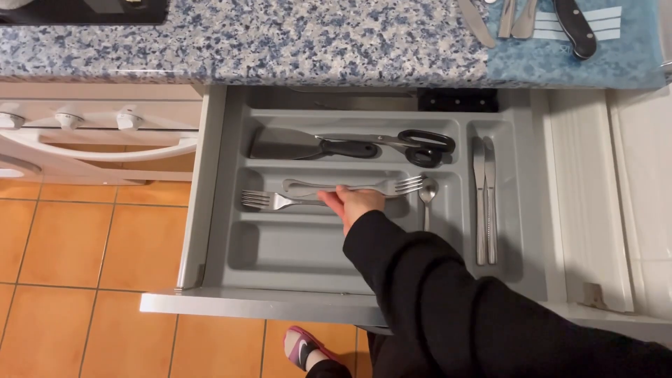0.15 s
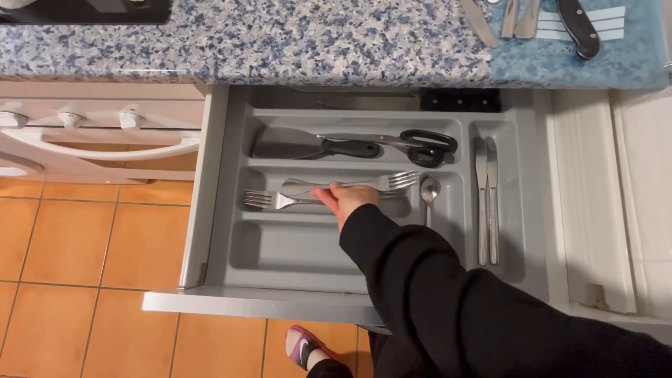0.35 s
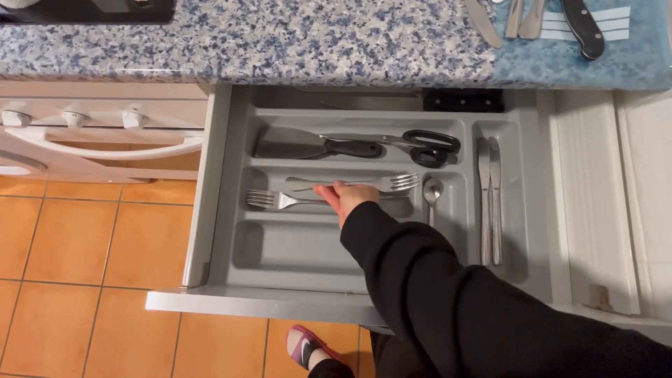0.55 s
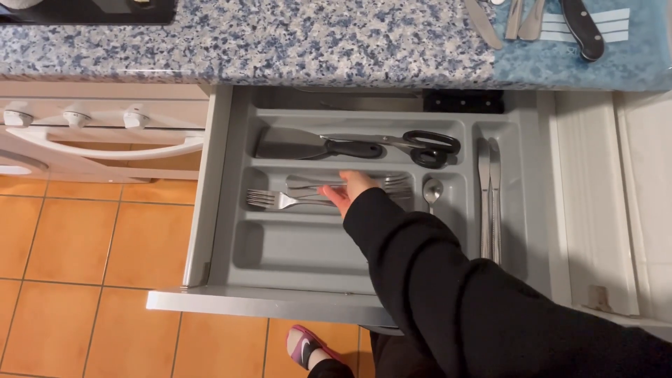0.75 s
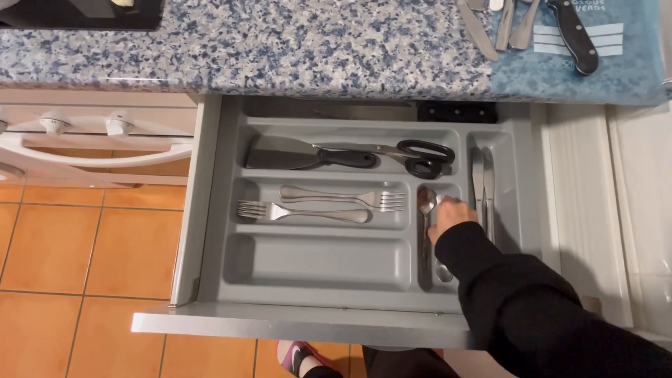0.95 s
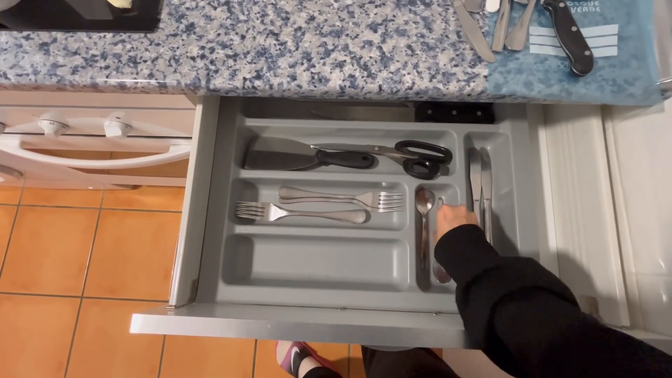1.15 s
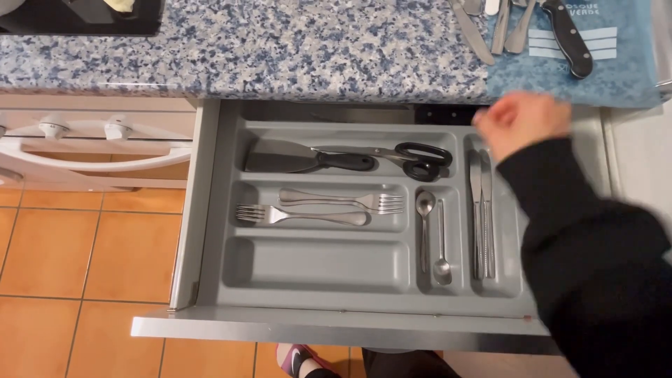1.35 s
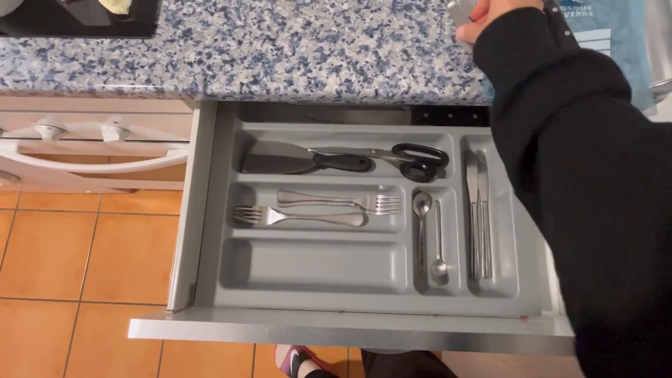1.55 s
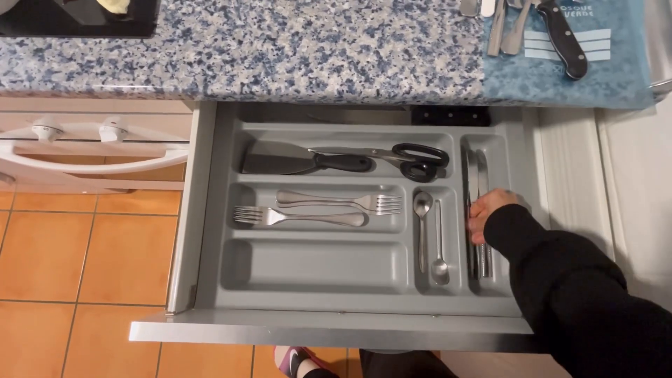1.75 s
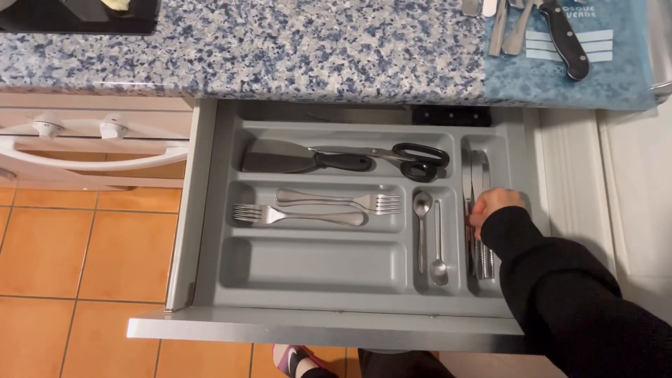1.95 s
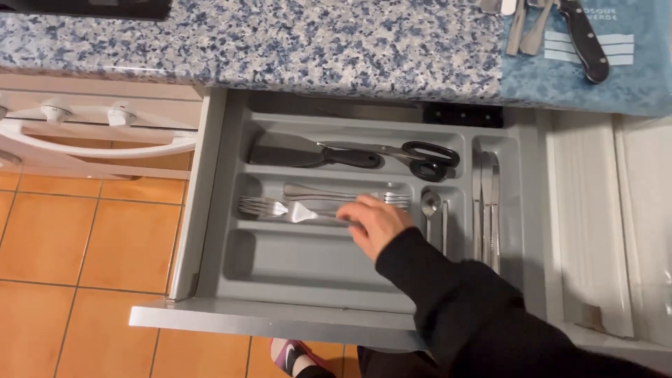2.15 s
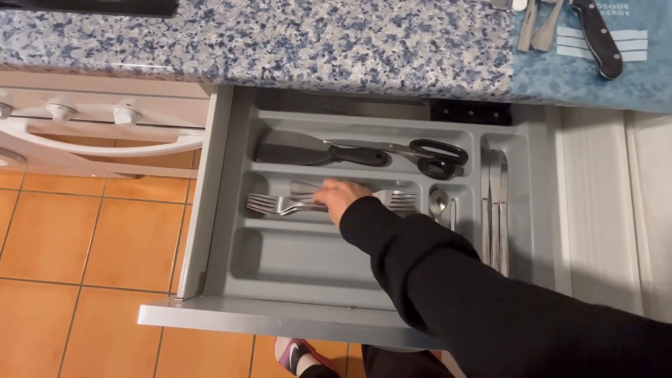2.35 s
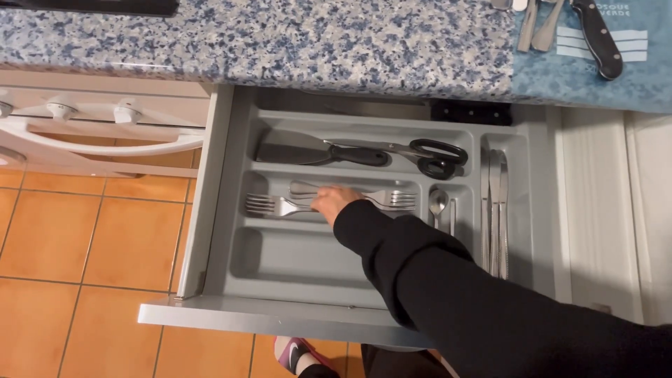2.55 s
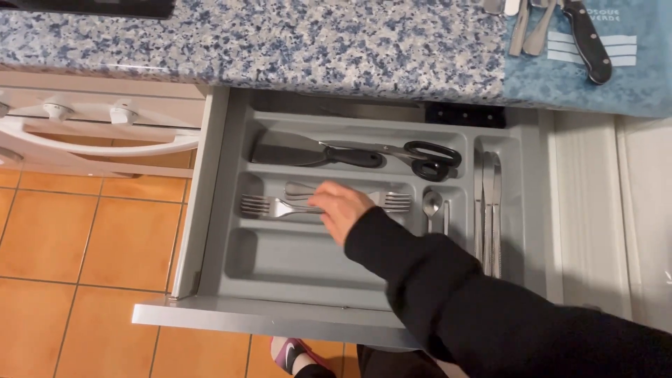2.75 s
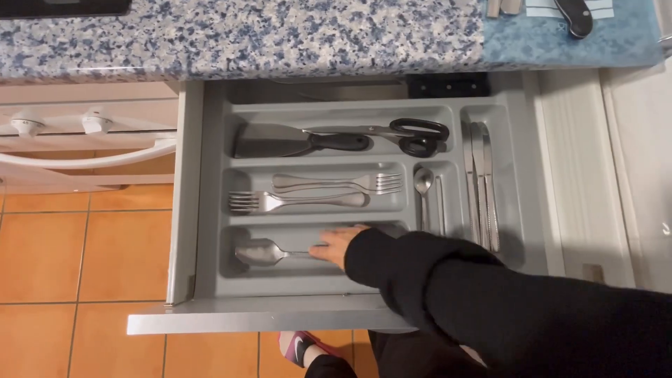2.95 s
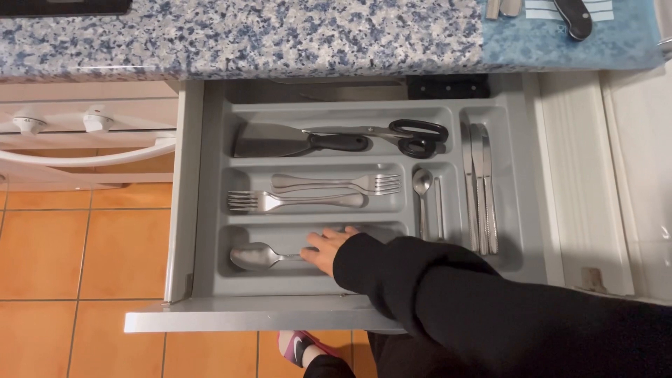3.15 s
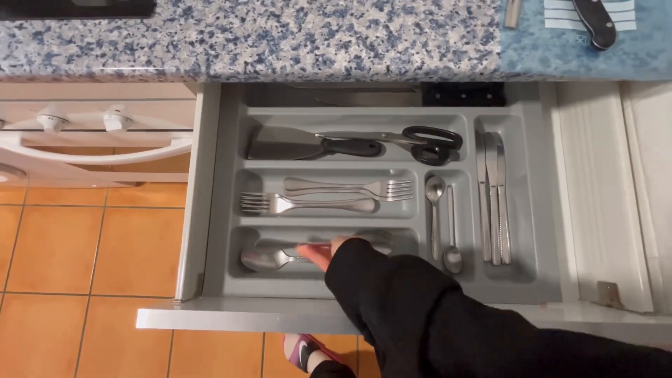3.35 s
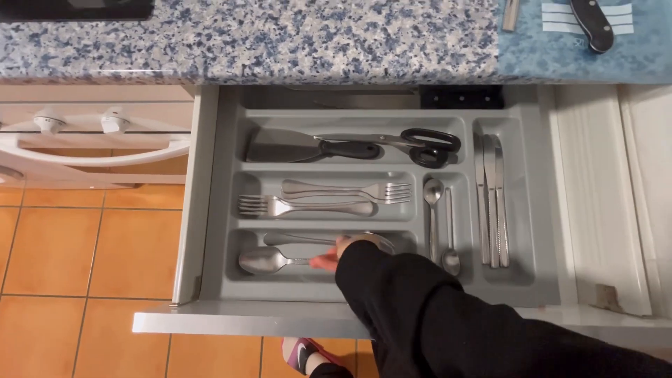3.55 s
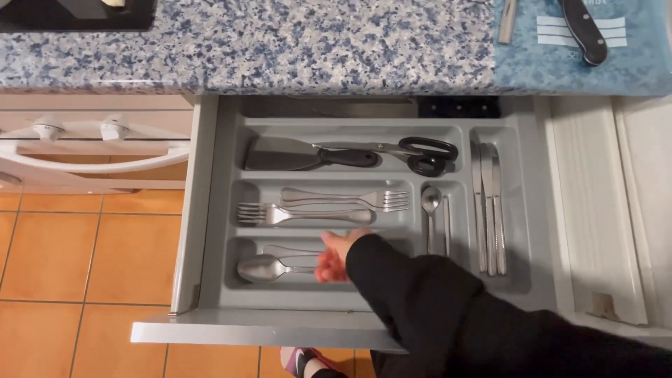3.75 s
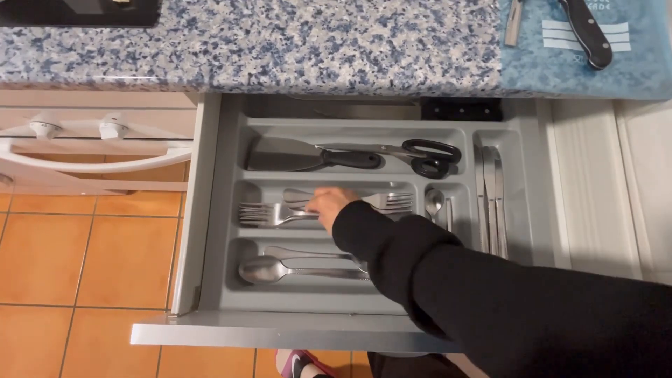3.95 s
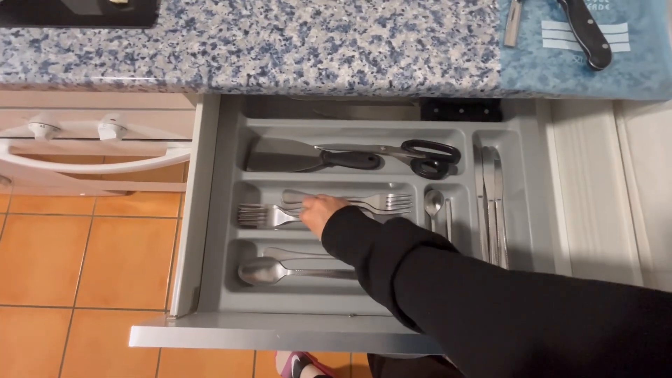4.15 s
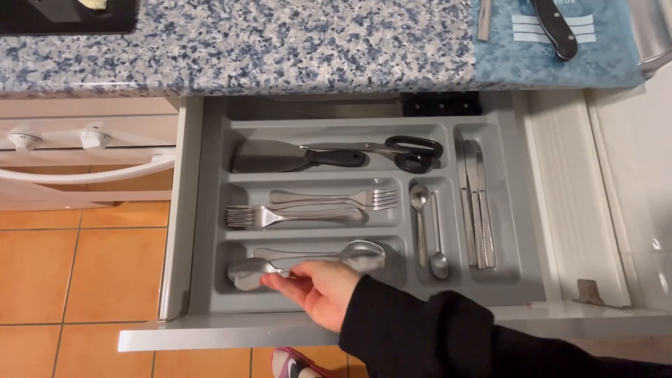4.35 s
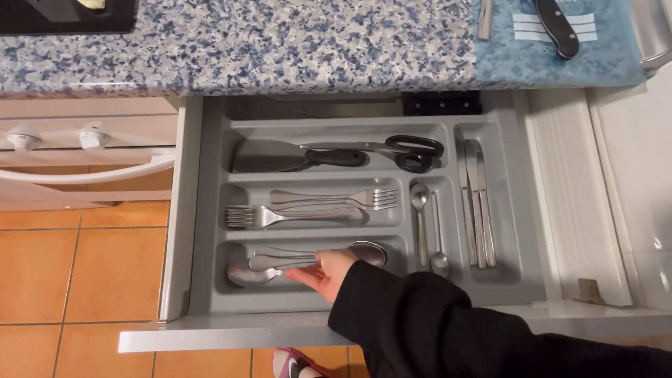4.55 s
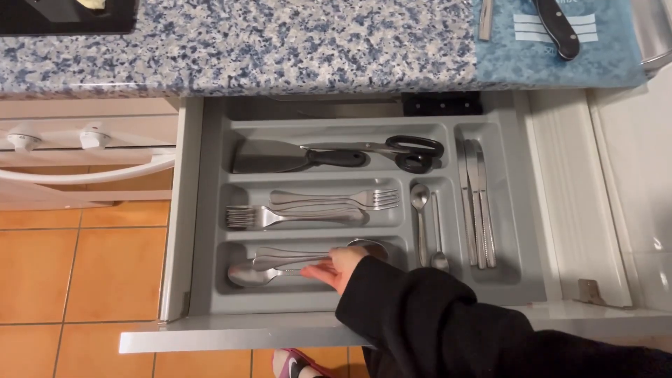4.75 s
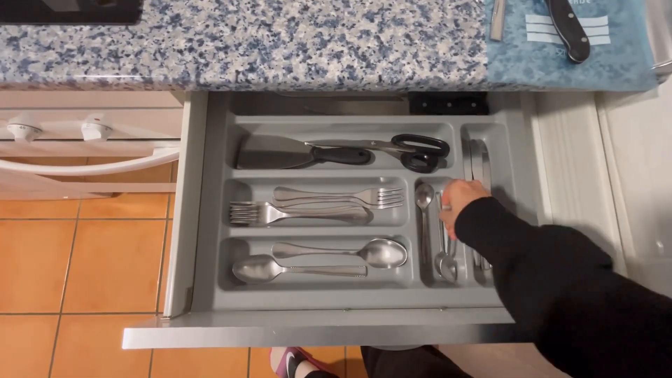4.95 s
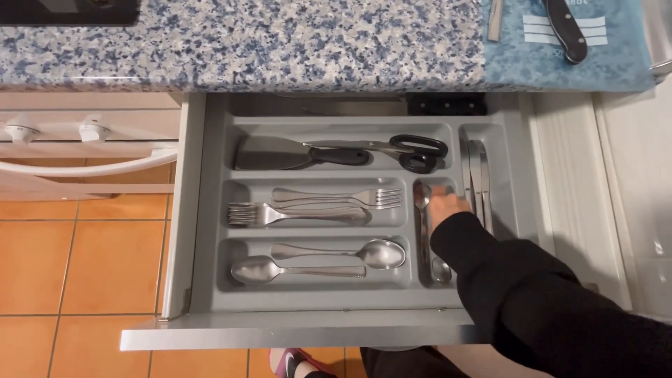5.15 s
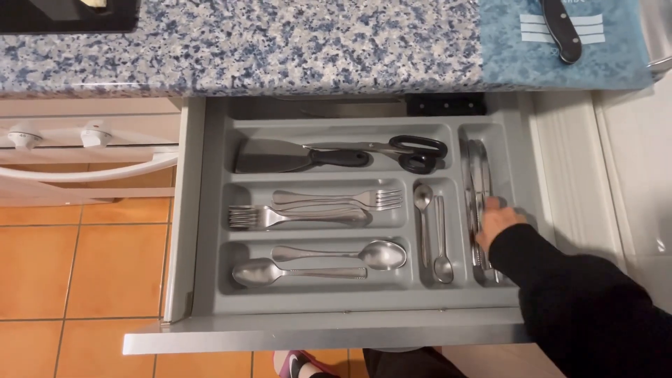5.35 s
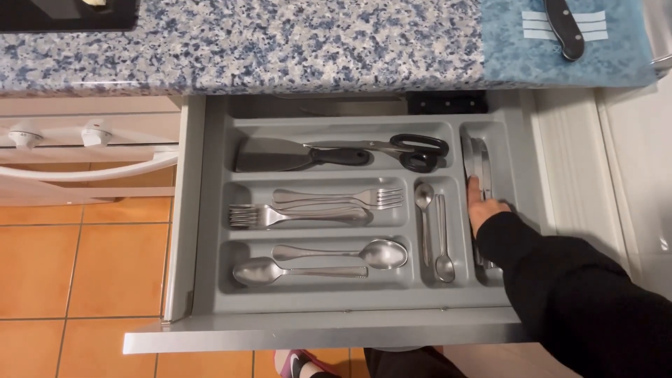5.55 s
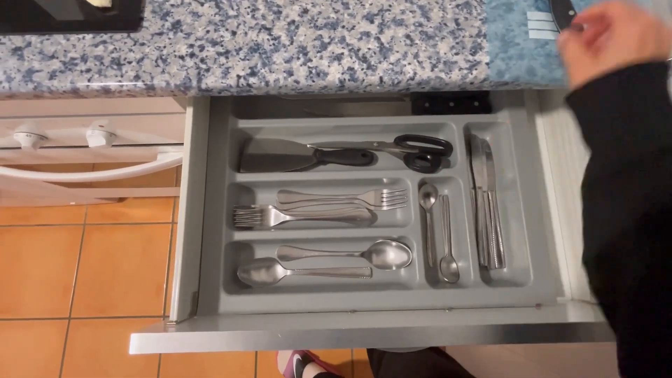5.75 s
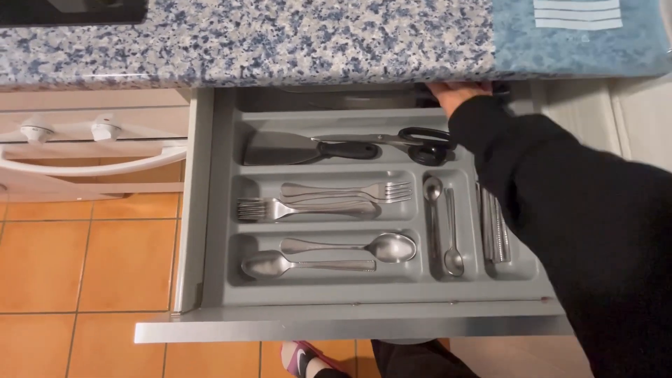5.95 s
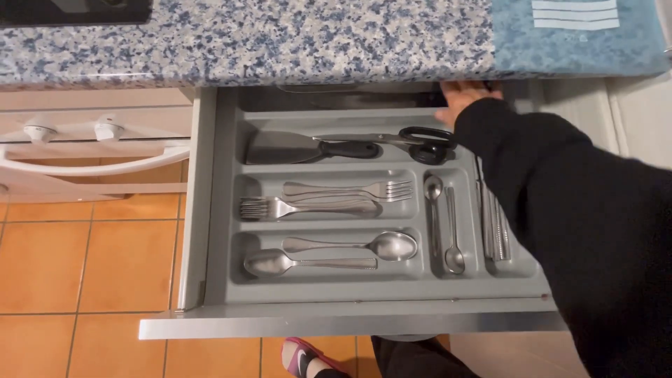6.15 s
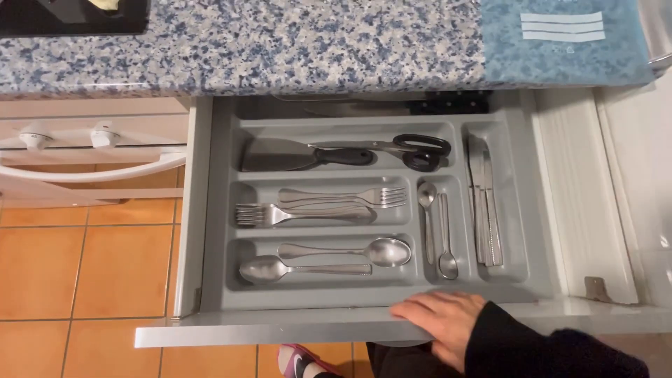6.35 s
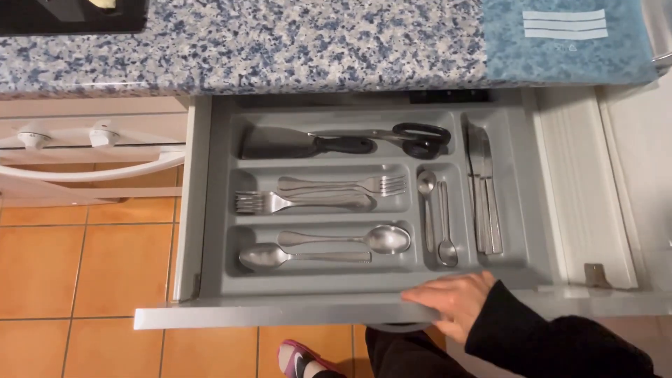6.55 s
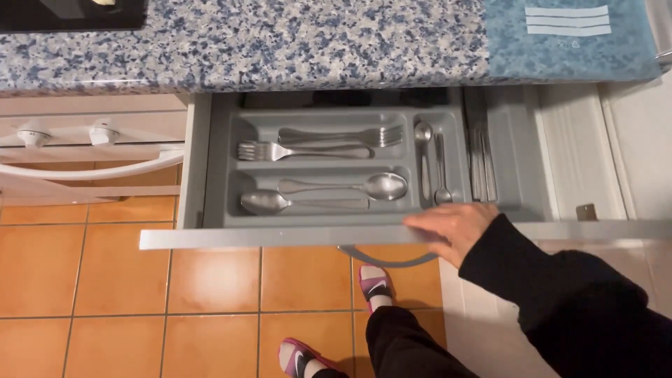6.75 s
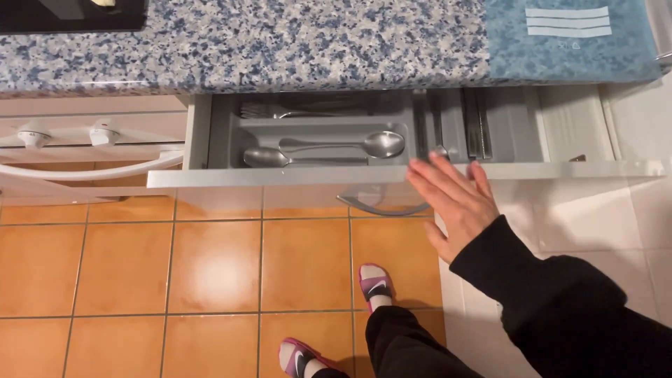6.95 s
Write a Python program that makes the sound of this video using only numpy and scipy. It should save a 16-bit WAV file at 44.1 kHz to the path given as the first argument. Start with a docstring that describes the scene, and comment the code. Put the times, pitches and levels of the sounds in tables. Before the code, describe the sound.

In a small kitchen, steel cutlery is put piece by piece into a plastic drawer tray. Each landing is a hard hollow knock with rapid rattling and short bright jingling. One handful knocks on the counter, faint metallic squeaks come later, and a knife lands behind the tray with a clearer ring. Finally the drawer rolls on rumbling runners. Close stereo microphone, loud blows slightly overloaded, abrupt cuts.

```python
"""Open kitchen drawer: steel forks, spoons and knives are dropped one by one into a plastic tray.
Each blow is a train of contacts: they ring tray and steel modes, clatter, and jangle the neighbours.
One handful knocks on the counter; one knife lands behind the tray and rings free.
Pieces squeak by stick-slip, shown as wavering harmonics; at the end the drawer rolls shut on rumbling noise.
The room answers; at each break all tails stop and the room tone fades back in."""
import sys
import numpy as np
from scipy import signal
from scipy.fft import rfft, irfft
from scipy.io import wavfile
from scipy.ndimage import uniform_filter1d

SR = 44100
rng = np.random.default_rng(int(sys.argv[2]) if len(sys.argv) > 2 else 0)


def master_out(mix):
    """Clip the mix to full scale and print it as 16-bit PCM to the path in sys.argv[1]."""
    frames = np.transpose(np.atleast_2d(mix))
    ceiling = np.clip(frames, -1, 1)
    pcm = np.round(ceiling * 32767).astype(np.int16)
    wavfile.write(sys.argv[1], SR, pcm)


N = 308700

# Strikes, each with its rattle: start_s, peak_db, steel_ring_db (re peak), rattle_t60_s (floored at 0.03)
STRIKES = [(0.0044, -30, -30, 0.37), (0.1621, -16, -19.5, 0.14), (0.269, -34.5, -17, 0.13),
           (0.31, -29, -67, 0.19), (0.5603, -25, -10, 0.09), (0.616, -20, -2.5, 0.22),
           (0.654, -3.5, -30, 0.076), (0.6835, -14.5, -41, 0.43), (0.781, -19, 4.5, 0.29),
           (0.8, -3.5, -10.5, 0.097), (0.862, -22, -26, 1), (0.974, -30, -52, 0.47),
           (1.051, 2.5, -33, 0.031), (1.0897, -4, -30, 0.046), (1.1125, -12, -37, 0.17),
           (1.14, -16, -36, 0.083), (1.5317, -16.5, 5.5, 0.76), (1.5595, -9.5, -8, 0.032),
           (1.576, -30, -21, 0.1), (1.7516, -10, -33, 0.065), (1.778, 4, -33.5, 0.047),
           (1.8096, -21, 0.5, 0.25), (1.876, 6, -6, 0.053), (2.3542, 3, -14.5, 0.038),
           (2.4044, -6.5, -9.5, 0.067), (2.419, -3.5, -5, 0.17), (2.8047, -13.5, -24.5, 0.61),
           (2.863, -12.5, -77, 0.14), (2.9548, 7.5, -39.5, 0.072), (3.33, -26.5, -34, 0.8),
           (3.4074, -10.5, -10.5, 0.053), (3.4377, 2, -31, 0.1), (3.458, -1, -6.5, 0.037),
           (3.603, -15, -44, 0.12), (3.628, -17, 4, 0.02), (3.7524, -34, -33, 0.046),
           (3.941, -11.5, -14.5, 0.39), (3.964, -16.5, -8, 0.1), (3.9898, 1, -14, 0.077),
           (4.046, -21, -1, 0.06), (4.1987, -28, -6.5, 0.041), (4.431, -15.5, 5.5, 0.47),
           (4.507, -11, 9.5, 0.12), (4.546, -5.5, 3.5, 0.16), (4.907, -8, -31, 0.052),
           (4.9902, -8, -13, 0.17), (5.061, -12.5, -6, 0.21), (5.1036, -4.5, 2.5, 0.083),
           (5.1389, -12.5, 12, 0.044), (5.2518, -20, -30, 0.036), (5.4171, -12, 2, 0.33),
           (5.466, -3.5, -1, 0.087), (5.6164, -25, -14, 0.45), (5.657, -33.5, 7.5, 0.12),
           (5.7355, -26, 6, 0.11), (5.798, -28.5, -14, 0.082), (6.0117, 2, -33, 0.15),
           (6.0863, -12.5, -14.5, 0.16), (6.1668, -13.5, -58, 0.097), (6.2746, -28.5, -57, 0.16),
           (6.3648, -29.5, -42, 0.068), (6.763, -27, -4, 0.039)]
# Tray and drawer modes: mode_hz, level_db
TRAY = [(107.7, -46), (193.8, -44.5), (263.8, -46.5), (382.2, -51), (506.0, -19), (624.5, -23.5),
        (769.8, -51), (840, -48.5), (931.3, -33.5), (1114, -33), (2040, -28.5)]
# Counter top modes: mode_hz, level_db
COUNTER = [(345, -23.5), (540, -26), (2435, -44), (2710, -16.5), (3970, -24), (4215, -20)]
# Modes of the space behind the tray: mode_hz, level_db
DRAWER_BACK = [(107, -43), (527, -32.5), (625, -28.5), (750, -28.5), (1016, -32), (1944, -38.5)]
# Steel modes of a paring knife: mode_hz, level_db
PARING_KNIFE = [(4925, 3)]
# Steel modes of pieces heaped on the counter: mode_hz, level_db
PILE = [(7290, -4), (9480, -8), (11600, 1), (15200, 5)]
# Steel modes of a fork: mode_hz, level_db
FORK = [(5760, -13.5), (6310, -6), (8900, -8), (11300, -1.5), (14100, 4.5)]
# Steel modes of a knife: mode_hz, level_db
KNIFE = [(5250, -10.5), (7140, -3.5), (9715, -3.5), (10400, -6), (12900, 2), (15050, 5)]
# Steel modes of a spoon: mode_hz, level_db
SPOON = [(4800, -22), (6340, 0), (7800, -1.5), (8870, -1.5), (10400, 0.5), (12000, 1.5), (13800, 2),
         (15200, -8.5)]
# Steel modes of a teaspoon: mode_hz, level_db
TEASPOON = [(6860, -6.5), (7850, -23), (13300, -15.5), (14600, -1)]
# Pieces as put down; heavy ones shake the whole drawer:
# start_s, steel_modes, surface_modes, boom_db, thud_db (added below THUD_HZ)
PIECES = [(0, TEASPOON, TRAY, 0.5, -32.5), (0.551, FORK, TRAY, 2, -24), (.97, TEASPOON, TRAY, -7.5, 7),
          (1.519, PILE, COUNTER, 4, 0.5), (1.7, KNIFE, TRAY, 1, -20.5), (2.341, FORK, TRAY, -2, 7),
          (2.8, SPOON, TRAY, -1.5, -4), (3.302, FORK, TRAY, -2.5, 6.5), (3.931, SPOON, TRAY, -1, -32),
          (4.42, SPOON, TRAY, -1.5, 8), (4.9, TEASPOON, TRAY, -1, 2), (5.398, KNIFE, TRAY, 1.5, 4),
          (6.0, PARING_KNIFE, DRAWER_BACK, 6, 4.5), (6.6, KNIFE, TRAY, -9, -12)]
# Clatter spectrum: freq_hz, level_db (per Hz)
CLATTER = [(470, -34), (800, 4.5), (4570, -15.5), (9220, -16), (14700, -13), (16000, -23.5)]
# Drawer on its runners: time_s, level_db
ROLL = [(6.42, -52), (6.55, -42), (6.7, -29), (6.82, -25.5), (7.0, -33.5)]
# Runner rumble spectrum: freq_hz, level_db (per Hz)
RUMBLE = [(35, -37.5), (60, -13.5), (188, -5), (480, -13.5), (1160, -29.5), (6750, -48), (14000, -58)]
# Room tone spectrum: freq_hz, level_db (per Hz)
HUSH = [(29, -37.5), (50, -3), (3000, -17.5), (6120, -26), (13500, -32.5), (15500, -56)]
# The sound breaks off, the room tone fades back in: time_s
BREAKS = [0.13, 0.97, 1.599, 2.165, 3.288, 3.899, 4.302, 4.838, 5.338, 5.859]
# Room decay: freq_hz, t60_s
ROOM_T60 = [(100, 0.51), (500, 0.26), (3000, 0.33), (14000, 0.22)]
# Stereo width: freq_hz, side_minus_mid_db
SPREAD = [(60, -21.5), (300, -16), (600, -1.5), (1650, 2), (4970, 0), (15000, 1.5)]
# Stereo lean: freq_hz, left_minus_right_db
LEAN = [(380, -0.5), (1500, 1.5), (4500, 5.5), (14000, -1)]
# Squeaks, one table each: time_s, pitch_hz, level_db, tilt_db (per overtone)
SQUEAKS = [
    [(2.172, 1714, -41, -9), (2.215, 1640, -29, -8), (2.245, 1645, -34, -7), (2.275, 1640, -39, -2),
     (2.292, 1760, -39, 1), (2.352, 1765, -37.5, 1.5)],
    [(2.168, 1912, -38, -14), (2.285, 1890, -50, -16)],
    [(2.6, 2400, -60, -7), (2.655, 2640, -53, -5), (2.735, 2580, -60, -5)],
]
# Squeak harmonics, fundamental first: level_db (before tilt)
SQUEAK_OVERTONES_DB = [0.5, 1.5, -1, -11, -11]

HUSH_DB, FADE_S = -52, 0.041
ROOM_DB, NEAR_T60_S = -32.5, 0.0067
BAND_EDGES_HZ = 40 * 2 ** np.arange(0, 9.1, 1)
# Contact rate before clumping; scale of the exponential size spread; first touch; swell time constant
CONTACTS_PER_S, CONTACT_SPREAD_DB, FIRST_TOUCH_DB, SWELL_S = 700, 2, 3.5, 0.002
# Boom at 0 dB peak; share of the peak's dB followed; dB lost per dB of ring above STEEL_ON_STEEL_DB
BOOM_DB, BOOM_FOLLOWS, BOOM_LOSS, STEEL_ON_STEEL_DB = -1.5, 0.94, 0.079, -12.5
# Clatter treble edge at 0 dB ring; share of the ring's dB by which it sinks
CONTACT_HZ, CONTACT_FOLLOWS = 12480, 0.4
TRAY_DB, STEEL_DB, CLATTER_DB = 25.5, 17, 30.5
# The tray answers mostly to the first contacts; it is too small for deep bass
BOOM_T60_S, BODY_CUT_HZ, THUD_HZ = 0.31, 97.6, 300
TRAY_CYCLES, TRAY_T60_MIN_S, TRAY_T60_MAX_S = 25, .013, .1
JANGLE_DB, JANGLE_TILT_DB, JANGLE_T60_S = 25.5, 3, .024   # tilt in dB per octave
# Lying on plastic shortens the ring; like pieces beside it ring off pitch by about this share
STEEL_T60_S, STEEL_DETUNE = .05, .015
# The blade behind the tray hangs free: longer, clearer, beating ring
FREE_T60_S, FREE_DB, FREE_BEAT_HZ = .24, 10, 14


def amp(db):
    """Decibels to gain."""
    return 10 ** (np.asarray(db, float) / 20)


def rms_one(x):
    """Scale to unit rms."""
    return x / np.sqrt(np.mean(x ** 2) + 1e-20)


def smooth_noise(shape, size):
    """Unit-rms noise averaged over size samples: a slow random motion."""
    return rms_one(uniform_filter1d(rng.standard_normal(shape), size=size))


def at_hz(points, hz):
    """Read a spectrum table on a log-frequency axis."""
    points = np.array(points)
    return np.interp(np.log(hz), np.log(points[:, 0]), points[:, 1])


def gains(rows, column):
    """One dB column as a gain in time, silent outside its span."""
    rows = np.array(rows)
    return amp(np.interp(np.arange(N) / SR, rows[:, 0], rows[:, column], left=-200, right=-200))


def bands(x):
    """Octave bands of x with their centres in Hz."""
    for low, high in zip(BAND_EDGES_HZ, np.minimum(BAND_EDGES_HZ[1:], .45 * SR)):
        sos = signal.butter(1, [low, high], "band", fs=SR, output="sos")
        yield np.sqrt(low * high), signal.sosfilt(sos, x)


def coloured(x, spectrum, share=1):
    """Causal filter of the given spectrum: minimum-phase response, folded from the cepstrum."""
    size = 4096
    hz = np.arange(1, size // 2 + 2) * SR / size
    cepstrum = irfft(np.log(amp(share * at_hz(spectrum, hz))))
    cepstrum[1:size // 2] *= 2
    cepstrum[size // 2 + 1:] = 0
    response = irfft(np.exp(rfft(cepstrum)))
    return signal.fftconvolve(x, response)[:len(x)]


def widen(mid, side):
    """Left and right from mid and side, with width and lean following frequency."""
    side = coloured(side, SPREAD)
    left = coloured(mid + side, LEAN, share=.5)
    right = coloured(mid - side, LEAN, share=-.5)
    return np.array([left, right])


def room_tone():
    """Stereo background hush: steady coloured noise."""
    mid, side = [coloured(rng.standard_normal(N), HUSH) for channel in range(2)]
    return amp(HUSH_DB) * rms_one(widen(mid, side))


def rattle_clicks():
    """Random contacts of random size and sign, coming in bunches."""
    size_db = CONTACT_SPREAD_DB * np.minimum(rng.exponential(1, N), 4)
    sizes = amp(size_db) * rng.choice([-1, 1], N)
    clumps = amp(5.0 * smooth_noise(N, 300))
    return sizes * (rng.random(N) < CONTACTS_PER_S * clumps / SR)


def contacts(start, stop, rattle):
    """Each strike is a first touch, then a rattle that swells and dies; it drives all four layers."""
    boom, clatter, rings, neighbours = out = np.zeros((4, stop - start))
    for s, peak_db, steel_db, t60 in STRIKES:
        # soft blows are duller; steel on steel spares the tray
        steel_loss_db = BOOM_LOSS * max(steel_db - STEEL_ON_STEEL_DB, 0)
        boom_db = BOOM_DB + BOOM_FOLLOWS * peak_db - steel_loss_db
        at, t60 = round(s * SR), max(t60, .03)
        if start <= at < stop:
            t, here = np.arange(stop - at) / SR, at - start
            train = rattle[at:stop] * (1 - np.exp(-t / SWELL_S)) * amp(-60 * t / t60)
            train[0] = amp(FIRST_TOUCH_DB)
            # the blow's energy is shared among its contacts
            train *= np.sqrt(min(t60, t[-1]) / np.sum(train ** 2))
            early = train * amp(-60 * t / BOOM_T60_S)
            early_makeup = np.sqrt(np.sum(train ** 2) / np.sum(early ** 2))
            # one-pole low-pass set by the ring level
            soft = np.exp(-2 * np.pi * CONTACT_HZ * amp(CONTACT_FOLLOWS * steel_db) / SR)
            boom[here:] += amp(boom_db) * early * early_makeup
            clatter[here:] += amp(peak_db) * signal.lfilter([1 - soft], [1, -soft], train)
            rings[here:] += amp(peak_db + steel_db) * train
            neighbours[here:] += amp(peak_db + steel_db + JANGLE_DB) * jangle(train)
    return out


def jangle(clicks):
    """Neighbouring pieces ring briefly in 60 modes, at other pitches for every strike."""
    t = np.arange(round(JANGLE_T60_S * SR)) / SR
    hz = rng.uniform(3000, 16300, size=(60, 1))
    modes = amp(JANGLE_TILT_DB * np.log2(hz) - 60 * t / JANGLE_T60_S) * np.sin(2 * np.pi * hz * t)
    response = rms_one(modes.sum(axis=0)) / np.sqrt(len(t))
    return signal.fftconvolve(clicks, response)[:len(clicks)]


def ring(clicks, modes, uneven_db, wander_db):
    """Clicks drive damped resonators, unevenly per mode and wandering as the piece turns."""
    out, energy, at = 0, 0, np.flatnonzero(clicks)
    for hz, level_db, t60 in modes:
        r, w = amp(-60 / (t60 * SR)), 2 * np.pi * hz / SR
        turn = smooth_noise(len(clicks) // 256 + 64, 7)[at // 256]   # one step per 256 samples
        blow_db = level_db + uneven_db * rng.standard_normal(len(at)) + wander_db * turn
        blows = np.full(len(clicks), 1e-18)
        blows[at] = clicks[at] * amp(blow_db)
        out = out + signal.lfilter([0, np.sin(w)], [1, -2 * r * np.cos(w), r * r], blows)
        energy += amp(level_db) ** 2 / (4 - 4 * r * r)
    return out / np.sqrt(energy)   # nominal unit energy per click


def surface_modes(surface, thud_db):
    """Surface modes last a set number of cycles within limits; the thud level acts on the low ones."""
    return [(hz, db + thud_db * (hz < THUD_HZ), np.clip(TRAY_CYCLES / hz, TRAY_T60_MIN_S, TRAY_T60_MAX_S))
            for hz, db in surface]


def steel_modes(piece):
    """Steel rings short with detuned copies beside it; the free blade rings long in beating pairs."""
    if piece == PARING_KNIFE:
        return [(hz + FREE_BEAT_HZ * off, db, FREE_T60_S) for hz, db in piece for off in (0, 1)]
    return [(hz * (1 + STEEL_DETUNE * off * rng.uniform(0.42, 2.3)), db, STEEL_T60_S)
            for hz, db in piece for off in (-1, 0, 1)]


def bodies(start, boom, rings):
    """Contacts ring in the surface and in the piece being put down."""
    out = np.zeros(len(boom))
    starts = [round(row[0] * SR) - start for row in PIECES] + [N]
    for (s, piece, surface, boom_db, thud_db), first, last in zip(PIECES, starts, starts[1:]):
        first, last = max(first, 0), min(last, len(boom))
        if first < last:
            # only contacts before the next piece; the ring itself runs on
            own = np.arange(len(boom) - first) < last - first
            tray = ring(boom[first:] * own, surface_modes(surface, thud_db), uneven_db=4.0, wander_db=3.0)
            steel = ring(rings[first:] * own, steel_modes(piece), uneven_db=6.0, wander_db=5.5)
            out[first:] += amp(TRAY_DB + boom_db) * tray
            out[first:] += amp(STEEL_DB + FREE_DB * (piece == PARING_KNIFE)) * steel
    return signal.sosfilt(signal.butter(4, BODY_CUT_HZ, "high", fs=SR, output="sos"), out)


def crack():
    """Clatter of one contact: a unit-energy coloured impulse."""
    pulse = coloured(np.r_[1., np.zeros(SR // 10)], CLATTER)
    return pulse / np.sqrt(np.sum(pulse ** 2))


def kitchen():
    """Stereo response: direct sound, sideways burst off the drawer walls, room decay set per band."""
    t = np.arange(SR * 2 // 5) / SR
    room = sum(band * amp(ROOM_DB - 60 * t / at_hz(ROOM_T60, hz))
               for hz, band in bands(rng.standard_normal((2, len(t)))))
    burst = rng.standard_normal(len(t)) * amp(-60 * t / NEAR_T60_S)
    direct = t == 0
    return widen(room[0] + direct, room[1] + burst / np.sqrt(np.sum(burst ** 2)))


def squeak(table):
    """Stick-slip of steel on the plastic tray: a wavering, fluttering harmonic tone."""
    rows, t = np.array(table), np.arange(N) / SR
    waver, flutter = smooth_noise((2, N), 250)
    pitch_hz = np.interp(t, rows[:, 0], rows[:, 1]) * (1 + 0.013 * waver)
    phase = 2 * np.pi * np.cumsum(pitch_hz) / SR
    tilt_db = np.interp(t, rows[:, 0], rows[:, 3])
    tone = sum(amp(db + k * tilt_db) * np.sin((k + 1) * phase)
               for k, db in enumerate(SQUEAK_OVERTONES_DB))
    return gains(table, 2) * amp(3.5 * flutter) * tone


def drawer_roll():
    """Rollers rumble lumpily along the runners: coloured noise of uneven level."""
    lumps = amp(3.5 * smooth_noise(N, 400))
    return gains(ROLL, 1) * rms_one(coloured(rng.standard_normal(N) * lumps, RUMBLE))


def scene():
    """Render every stretch between two breaks on its own, so that no tail crosses a break."""
    out, rattle, clatter_pulse = room_tone(), rattle_clicks(), crack()
    steady = sum(squeak(table) for table in SQUEAKS) + drawer_roll()
    edges = [0] + [round(s * SR) for s in BREAKS] + [N]
    for start, stop in zip(edges, edges[1:]):
        size = stop - start
        boom, clatter, rings, neighbours = contacts(start, stop, rattle)
        dry = bodies(start, boom, rings) + neighbours + steady[start:stop]
        dry += amp(CLATTER_DB) * signal.fftconvolve(clatter, clatter_pulse)[:size]
        out[:, start:stop] *= np.clip(np.arange(size) / (FADE_S * SR), .1, 1)
        # fresh reflections per stretch
        out[:, start:stop] += signal.fftconvolve(dry[None], kitchen(), axes=1)[:, :size]
    return out


def record(dry):
    """The loudest blows overload the input; the deep bass is lost, the top is cut."""
    driven = 0.94 * np.tanh(dry / 1.313)
    thin = signal.sosfilt(signal.butter(4, 70, "high", fs=SR, output="sos"), driven)
    top_cut = signal.cheby2(12, 60, 16500, fs=SR, output="sos")   # order, stopband dB, stopband edge Hz
    return np.clip(signal.sosfilt(top_cut, thin), -1, 1)


dry = scene()
out = record(dry)
master_out(out)
```